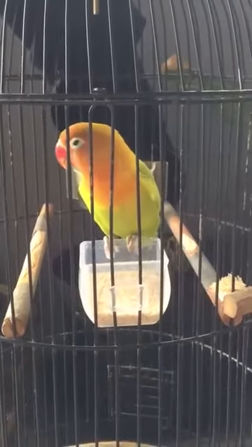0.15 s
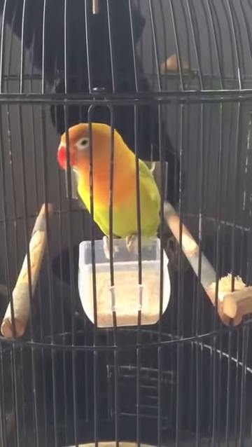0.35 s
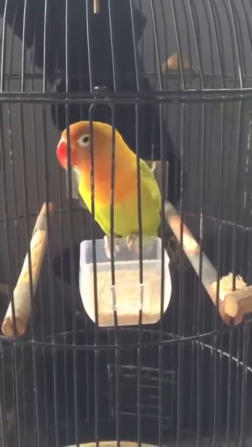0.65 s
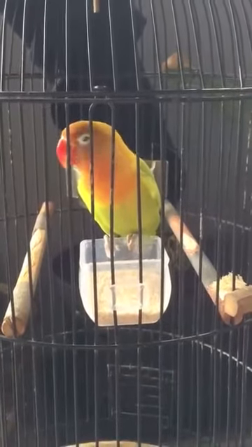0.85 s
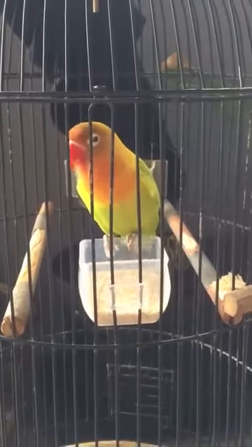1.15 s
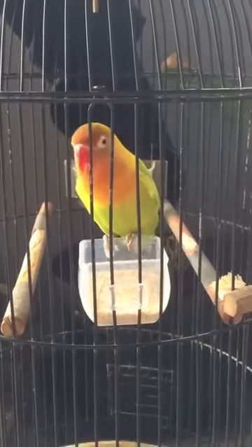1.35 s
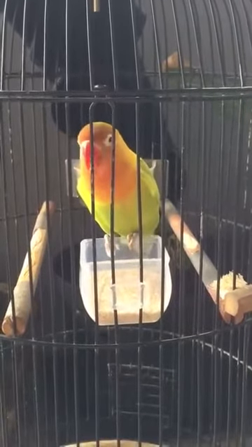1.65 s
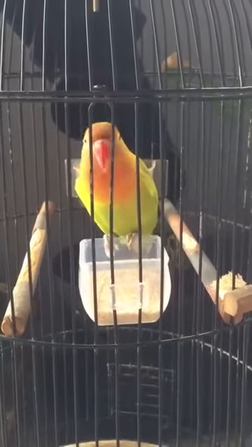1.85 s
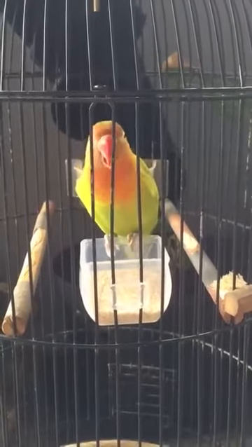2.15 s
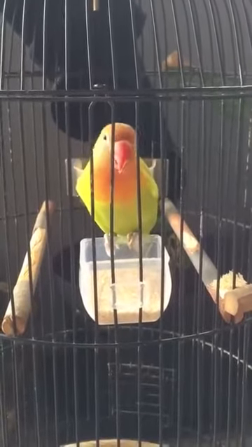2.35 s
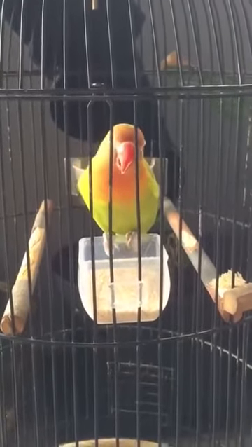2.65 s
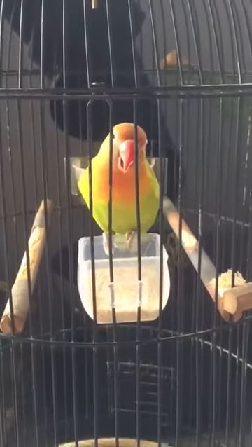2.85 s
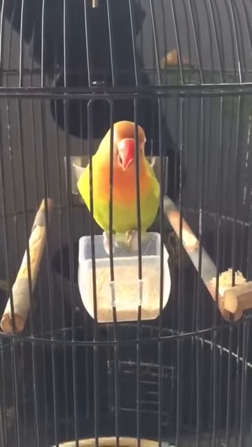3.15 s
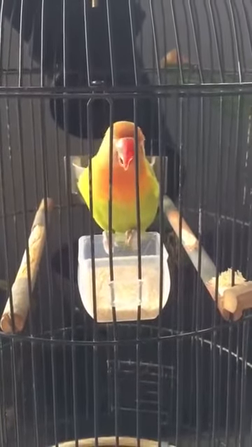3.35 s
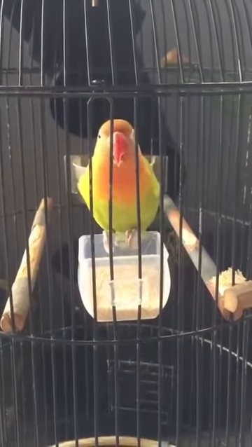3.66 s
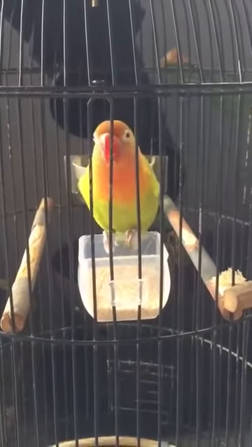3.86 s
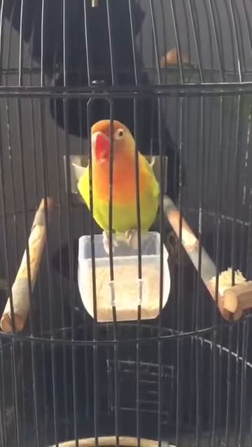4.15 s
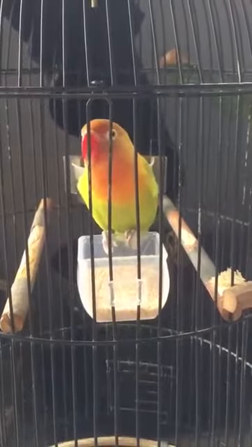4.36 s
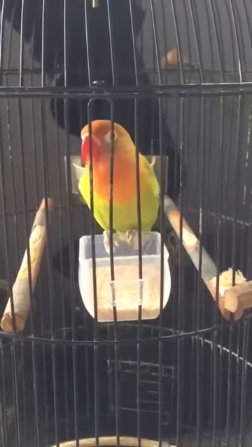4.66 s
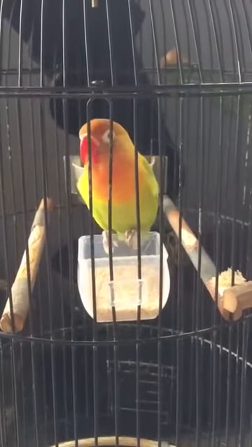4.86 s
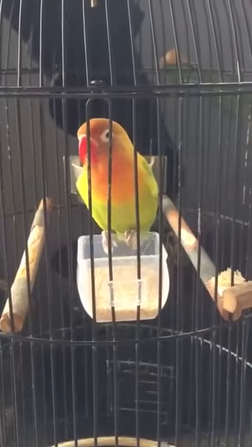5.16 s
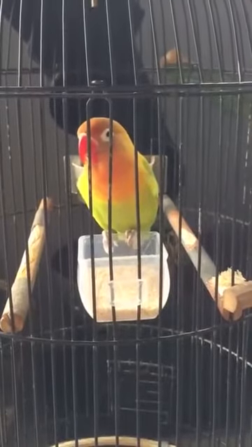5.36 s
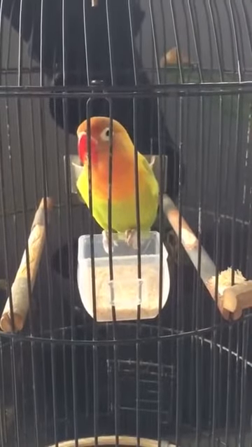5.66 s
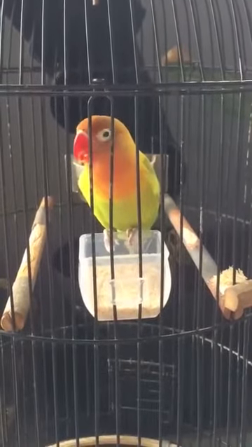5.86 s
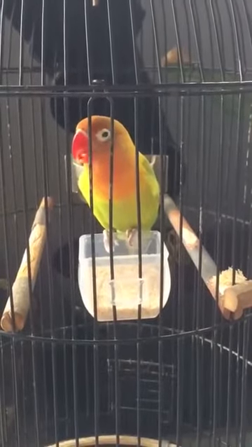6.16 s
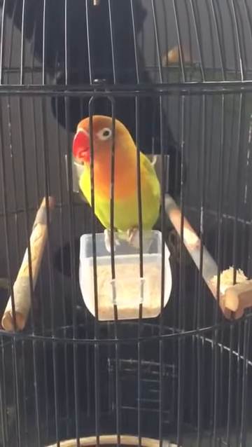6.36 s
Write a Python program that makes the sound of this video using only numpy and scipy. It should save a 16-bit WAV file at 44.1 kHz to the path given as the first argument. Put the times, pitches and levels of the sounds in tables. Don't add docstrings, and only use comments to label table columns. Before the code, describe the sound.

Close, loud and slightly overdriven bird song with a bright room tail. Five thin high whistles open, about four a second; the calls then accelerate to seven or eight a second, cracking from low raspy notes up to shrill ones. Near five seconds they become softer clucks with ticks and a small cloth rustle, then loud swooping chirps return. A distant bird and low rumble are barely audible.

```python
import sys
import numpy as np
from scipy import signal
from scipy.fft import rfft, irfft, next_fast_len
from scipy.io import wavfile
from scipy.ndimage import uniform_filter1d, map_coordinates

SR = 44100
rng = np.random.default_rng(int(sys.argv[2]) if len(sys.argv) > 2 else 0)


def level_to_linear(level):
    exponent = np.asarray(level, float) / 20
    return 10 ** exponent


def dump_mix(stems):
    frames = np.atleast_2d(stems).T
    limited = np.clip(frames, -1, 1)
    pcm = np.round(limited * 32767).astype(np.int16)
    wavfile.write(sys.argv[1], SR, pcm)


N = 287091
T = np.arange(N) / SR
SPLIT_HZ, TOP_HZ = 8700, 15900


def unit(x):
    return x / np.sqrt(np.mean(x ** 2) + 1e-20)


def along(points, hz):
    f, v = np.transpose(points)
    return np.interp(np.log(hz + 1), np.log(f + 1), v)


def wobble(rate):
    return map_coordinates(rng.standard_normal(int(N * rate / SR) + 4), [T * rate])


def filtered(x, response):
    m = next_fast_len(N + 8192)
    return irfft(rfft(x, m) * response(np.fft.rfftfreq(m, 1 / SR)), m)[:N]


def noise(spectrum):
    return unit(filtered(rng.standard_normal(N), lambda hz: level_to_linear(along(spectrum, hz))))


def background():
    # time in seconds, level in dB.
    hum_level = [(0, -67), (1.12, -63), (2.03, -65), (2.9, -65), (3.3, -73), (3.75, -73), (4.05, -60),
                 (4.74, -59), (5.14, -55), (5.56, -58), (6.5, -57)]
    # frequency in Hz, level in dB per Hz.
    low_colour = [(20, -19), (45, -6), (60, -13.5), (80, -8), (130, -17), (157, -7), (190, -18.5),
                  (400, -37), (1500, -27), (2500, -94)]
    # time in seconds, level in dB.
    cloth_level = [
        (5.365, -80),
        (5.378, -39.5),
        (5.47, -46),
        (5.62, -64),
    ]
    hum_db = np.interp(T, *np.transpose(hum_level)) + 1.5 + 4.46 * wobble(6.5)
    hum = level_to_linear(hum_db) * noise(low_colour)
    cloth = noise([(150, -35), (300, -3), (800, -4), (1500, -7), (2300, -26), (4000, -80)])
    cloth_db = np.interp(T, *np.transpose(cloth_level), -120, -120) + 4.36 * wobble(60)
    rustle = level_to_linear(cloth_db) * cloth
    chirp_colour = [(4300, -33.5), (5000, -13), (5700, 3), (6400, -15), (7000, -40), (9000, -90)]
    earlier = level_to_linear(-36.5 - 60 * T / 0.34) * noise(chirp_colour)
    return hum + rustle + earlier


def smeared(rows, spread):
    s, hz, db = np.transpose(rows)
    phase = 2 * np.pi * np.cumsum(np.interp(T, s, hz)) / SR
    blur = wobble(spread) * np.sin(phase) + wobble(spread) * np.cos(phase)
    return level_to_linear(np.interp(T, s, db, -120, -120)) * blur


def far_sounds():
    # time in seconds, pitch in Hz, level in dB.
    falling = [
        (1.06, 3600, -65),
        (1.11, 3560, -47),
        (1.15, 2654, -45),
        (1.22, 2612, -45),
        (1.38, 2500, -60.5),
    ]
    # time in seconds, pitch in Hz, level in dB.
    held = [
        (1.05, 3620, -64),
        (1.12, 3600, -51),
        (1.36, 3550, -63),
    ]
    # time in seconds, pitch in Hz, level in dB.
    whirr = [
        (5.5, 1302, -55),
        (5.75, 1736, -49),
        (5.85, 1956, -64),
    ]
    return smeared(falling, spread=640) + smeared(held, spread=300) + smeared(whirr, spread=320)


def ticks():
    # moment in seconds, peak level in dB.
    tick_rows = [(4.9538, 8.5), (5.04, -4), (5.119, -3), (5.196, -5), (5.362, -4), (5.443, 2.5),
                 (5.5201, 1), (5.606, -2), (5.6845, 5)]
    rasp = noise(HUSK) + 1.2 * np.sin(2 * np.pi * 2350 * T)
    envelope = np.zeros(N)
    for s, db in tick_rows:
        envelope += (T > s) * level_to_linear(db - 35.5 - 60 * np.abs(T - s) / .012)
    return envelope * rasp


def clucks():
    # start in seconds, peak level in dB, pitch in Hz, length in seconds.
    cluck_rows = [(4.9792, -13.5, 2175, 0.0083), (5.0632, -12.5, 2130, 0.008), (5.1429, -12, 2132, 0.0081),
                  (5.2205, -7.5, 2121, 0.0094), (5.3071, -8.5, 2130, 0.0093), (5.3875, -14.5, 2179, 0.007),
                  (5.4685, -9.5, 2121, 0.0086), (5.5456, -7, 2108, 0.0088), (5.6313, -5.5, 2240, 0.009),
                  (5.7108, -7, 2160, 0.0089)]
    # (share of length, pitch factor, dB)
    shape = [(.05, 1.08, -6.5), (.2, 1.02, -4.5), (.7, .99, -9), (1.2, .98, -22)]
    rows = []
    for s, db, hz, length in cluck_rows:
        rows += [(s + share * length, hz * bend, db + drop_db, 3) for share, bend, drop_db in shape]
    return rows


def pips():
    # start in seconds, end in seconds, level in dB, held pitch in Hz, last pitch in Hz.
    whistles = [
        (0.0943, 0.13, -3.5, 5650, 5500),
        (0.3288, 0.364, -3, 5553, 5540),
        (0.5715, 0.606, -2, 5674, 5935),
        (0.7755, 0.809, -3.5, 5525, 5810),
        (0.972, 1.0, -1, 5477, 5380),
    ]
    rows = []
    for s, end, db, hz, last_hz in whistles:
        rows += [(s, 6100, db - 13, -35), (s + .008, 6250, db - 2.5, -35),
                 (s + 0.0097, 5000, db - 8, -35),
                 (s + .014, hz, db, -38), (end - .006, last_hz, db - 2.5, -38),
                 (end, last_hz, db - 24, -35)]
    return rows


def phrase(motif, calls):
    place, first_hz, last_hz, over_db, step_db = np.transpose(motif)
    rows = []
    for (start, crack, end, db, bend), late in zip(calls, np.linspace(0, 1, num=len(calls))):
        s = np.interp(place, range(3), [start, crack, end])
        hz = bend * (first_hz + late * (last_hz - first_hz))
        rows += list(zip(s, hz, db + over_db, step_db))
    return rows


def song():
    # place in the call (0 start, 1 voice break, 2 end), pitch in the first call in Hz,
    # pitch in the last call in Hz, level over the call in dB, step from one overtone to the next in dB.
    hook = [
        (0, 5250, 4400, -12, -15),
        (1, 6100, 5800, -2, -35),
        (1.17, 5550, 5200, 1.2, -28),
        (1.72, 5230, 5330, 1.2, -14),
        (2, 5120, 5250, -20, -17),
    ]
    flick = [(0, 2450, 2450, -13, -2), (.5, 3300, 3300, -6, -2), (.9, 4200, 4200, -13, -6),
             (1, 4950, 4950, -14, -14), (1.07, 5050, 5050, -3, -14), (1.6, 5350, 5350, .3, -18),
             (1.9, 5500, 5500, -3, -24), (2, 5400, 5400, -20, -28)]
    rise = [(0, 3350, 3000, -10, -6), (.4, 2950, 3050, -9, 3), (.72, 3150, 3200, -11, 4),
            (.78, 6250, 6300, -9, -16), (1, 4700, 4750, -7, -12), (1.15, 4950, 4850, -4, -12),
            (1.55, 5400, 5230, .3, -18), (1.86, 5350, 5550, -2, -24), (2, 5350, 5400, -20, -28)]
    climb = [(0, 2500, 2380, -6, 5), (1, 2980, 2860, -5, 5), (1.03, 5900, 5850, -3, -14),
             (1.14, 4950, 4820, -2.5, -12), (1.6, 5180, 5300, -.3, -18), (1.86, 5330, 5550, -1.2, -24),
             (2, 5200, 5300, -20, -28)]
    crack = [(0, 2500, 2150, -15, -6), (.4, 2500, 2150, -10, -2), (1, 2350, 2250, -9, -3),
             (1.07, 2800, 2720, -3, 3), (1.14, 5200, 5100, -2, -14), (1.2, 5850, 5950, .3, -14),
             (1.33, 5300, 5200, -.3, -14), (1.55, 5000, 4950, -3, -14), (2, 5150, 5050, -9, -14)]
    split = [(0, 2000, 1800, -17, -1.2), (.3, 2200, 2200, -10.5, .6), (1, 2230, 2380, -9, 1.2),
             (1.08, 2800, 2800, -4, 3), (1.16, 4900, 5600, -2, -14), (1.3, 5400, 5700, .3, -14),
             (1.6, 4950, 5200, -2.5, -14), (2, 4900, 4850, -9, -14)]
    yelp = [(0, 2100, 1950, -13, -4), (.35, 2620, 3000, -5, -8), (.75, 2700, 2700, -4, -2),
            (.93, 2400, 2450, -7, .3), (1, 5300, 5700, -5, -14), (1.1, 5200, 5850, -3, -14),
            (1.22, 4700, 4600, -.7, -14), (1.5, 4600, 4380, -1.5, -12), (2, 4550, 4290, -10, -8)]
    bark = [(0, 2950, 2950, -9, -16), (.15, 2620, 2620, -3, -12), (.75, 2600, 2600, -4, -4),
            (.93, 2280, 2280, -7, .3), (1, 5400, 5400, -6, -14), (1.12, 5900, 5900, -3, -14),
            (1.33, 4600, 4600, .3, -14), (2, 4500, 4500, -10, -8)]
    stair = [(0, 2080, 2000, -17, -5), (.24, 2130, 2080, -8, -8), (.35, 3640, 3560, -7, -24),
             (.85, 4050, 3950, .3, -17), (1, 4200, 4150, -6, -14), (1.1, 6120, 6080, -.3, -12),
             (1.3, 5850, 5950, -2, -14), (1.52, 4750, 4620, -2, -26), (2, 4400, 4500, -9, -23)]
    step = [(0, 2030, 1990, -14, -7), (.26, 2050, 2040, -8, -9), (.42, 3640, 3480, -6, -26),
            (.9, 3760, 3600, -3, -24), (1, 4050, 3700, .3, -20), (1.06, 6230, 6230, -3.5, -12),
            (1.2, 6200, 6050, -5, -25), (1.33, 4550, 4400, -2, -14), (1.45, 4330, 4300, 2, -10.5),
            (2, 4260, 4180, -6, -9)]
    tread = [(0, 1950, 1950, -15, -8), (.17, 2000, 2000, -9, -10), (.3, 3450, 3420, -6, -22),
             (.8, 3480, 3500, .3, -22), (1, 3500, 3550, -5, -20), (1.06, 5950, 6050, -6, -14),
             (1.24, 5950, 5900, -7, -25), (1.32, 4180, 4220, 2, -11), (2, 4080, 4100, -7, -11)]
    arch = [
        (0, 2050, 2300, -7, -6),
        (.5, 2900, 3450, -1.5, -12),
        (1, 4450, 4650, -2, -20),
        (1.18, 3950, 4150, .5, -17),
        (1.45, 3850, 3850, .5, -17),
        (1.75, 3780, 3750, -.5, -19),
        (2, 3780, 3800, -8, -14),
    ]
    dive = [
        (0, 4100, 4500, -5, -10),
        (.2, 4350, 5250, 1.2, -12),
        (.55, 2550, 3000, -4, -1.2),
        (.8, 2350, 2500, -9, 1.5),
        (1, 2300, 2380, -4, .6),
        (1.5, 2060, 2140, -.2, 3.5),
        (2, 2030, 2060, -12, 7),
    ]
    swoop = [
        (0, 4600, 4900, -7, -35),
        (.3, 5050, 5350, -1.5, -35),
        (.62, 5800, 6000, 6, -38),
        (.8, 5100, 5000, 5, -25),
        (1, 2560, 2400, -10.5, -8),
        (1.15, 2500, 2500, -8, 1.5),
        (1.6, 2920, 2900, 1.5, 10.5),
        (2, 3070, 3100, -6, 7),
    ]
    # start, break and end in seconds, level in dB, pitch factor (no unit).
    hooks = [(1.1844, 1.1899, 1.2207, -4, 1.001), (1.3667, 1.3733, 1.4028, -8, 1.001)]
    flicks = [(1.544, 1.549, 1.5874, -5.5, .999)]
    rises = [(1.6956, 1.7041, 1.7372, -5.5, 1.001), (1.8401, 1.8485, 1.8832, -7, .995),
             (1.9816, 1.9903, 2.026, -7.5, 1.005)]
    climbs = [(2.1148, 2.1229, 2.1594, -8, .99), (2.2522, 2.2611, 2.2975, -8.5, .985),
              (2.3845, 2.3942, 2.4295, -8, 1.02), (2.5108, 2.5212, 2.5593, -7.5, 1.005),
              (2.649, 2.657, 2.6954, -10, 1.015), (2.7858, 2.7918, 2.8313, -9, .99)]
    cracks = [(2.9161, 2.927, 2.963, -9, 1.001), (3.0404, 3.0575, 3.0841, -9, 1.001)]
    splits = [(3.1465, 3.1755, 3.1994, -11, .99), (3.2601, 3.2895, 3.315, -7.5, 1.001),
              (3.3818, 3.4116, 3.436, -8.2, 1.001)]
    yelps = [(3.503, 3.5365, 3.5578, -10, 1.001), (3.736, 3.7735, 3.7941, -11.5, 1.001)]
    barks = [(3.618, 3.6555, 3.6759, -10.5, 1.001)]
    stairs = [(3.8539, 3.8842, 3.9021, -8, 1.001), (3.965, 3.9964, 4.0145, -8.3, .995),
              (4.0779, 4.1067, 4.1295, -8, 1.001)]
    steps = [(4.1875, 4.2196, 4.2503, -11.7, .99), (4.3092, 4.3415, 4.3675, -10.8, 1.001)]
    treads = [(4.4295, 4.4625, 4.4903, -9.5, 1.001), (4.5545, 4.5859, 4.609, -11, 1.001)]
    arches = [(4.6734, 4.6854, 4.714, -11.3, 1.001), (4.778, 4.7924, 4.8169, -12.7, 1.001)]
    dives = [(5.7797, 5.7871, 5.8069, -9, .995), (5.8672, 5.8745, 5.8961, -10, 1.01),
             (5.9568, 5.967, 5.9883, -7.5, 1.001)]
    swoops = [(6.0488, 6.0605, 6.0855, -5, 1.008), (6.1405, 6.1535, 6.1775, -7.5, 1.01),
              (6.232, 6.2445, 6.268, -7.3, 1.015), (6.327, 6.3385, 6.3625, -8, 1.035),
              (6.4251, 6.435, 6.4576, -8.5, .975)]
    phrases = [(hook, hooks), (flick, flicks), (rise, rises), (climb, climbs), (crack, cracks),
               (split, splits), (yelp, yelps), (bark, barks), (stair, stairs), (step, steps),
               (tread, treads), (arch, arches), (dive, dives), (swoop, swoops)]
    rows = pips() + clucks()
    for motif, calls in phrases:
        rows += phrase(motif, calls)
    return sorted(rows)


# frequency in Hz, level in dB per Hz.
HUSK = [(350, -46), (900, -29), (1700, -19), (2300, -10), (3000, -9.5), (4200, -10), (5400, -2),
        (6600, -7.5), (7400, -22.5), (8400, -5), (9000, -12), (10300, 1.5), (11500, -7), (13200, .3),
        (15500, -7)]


def overtones(pitch, step):
    phase = 2 * np.pi * np.cumsum(pitch) / SR
    orders = np.arange(1, 8)[:, None]
    hz = orders * pitch
    low = pitch < 2400
    later_step = np.where(low, step, np.minimum(step, 0))
    loss_db = 5 + 3 * low + (6 - 11 * low) * (hz < 9600)
    size_db = step * (orders > 1) + later_step * (orders > 2) - 7.5 * np.maximum(orders - 3, 0)
    size_db = size_db - loss_db * (hz > 7300) * (orders > 2)
    size = level_to_linear(size_db) * (hz < TOP_HZ)
    return np.sqrt(2) * np.sum(size * np.sin(orders * phase), axis=0) / np.linalg.norm(size, axis=0)


def parrot():
    pause = .036
    s, hz, db, step_db = np.transpose(song())
    cut = np.flatnonzero(np.diff(s) > pause)
    starts, ends = s[np.r_[0, cut + 1]], s[np.r_[cut, -1]]
    k = np.clip(np.searchsorted(starts, T + pause / 2) - 1, 0, None)
    since = T - starts[k]
    gate = np.clip(1 + since / 0.00122, 0, 1) * np.clip(1 + (ends[k] - T) / 0.0012, 0, 1)
    pitch = np.exp(np.interp(T, s, np.log(hz)))
    leap = uniform_filter1d(np.abs(np.gradient(np.log(pitch))) * SR, size=40)
    depth = 0.12 + .45 * np.exp(-np.abs(since) / .022) + 0.12 * wobble(30)
    depth = np.clip(depth, 0, .9) * (pitch > 4400)
    flutter = 2 * np.pi * np.cumsum(230 * (1 + 0.12 * wobble(40))) / SR
    pitch = pitch * (1 + 0.015 * wobble(500) + 0.04 * depth * np.sin(flutter))
    step = np.interp(T, s, step_db)
    tone = overtones(pitch, step)
    tone *= 1 + 0.21 * wobble(1800)
    high = np.interp(starts, s, hz)[k] > 5000
    throat = sum(np.sin(2 * np.pi * ring_hz * T) for ring_hz in (2300, 4000, 8400))
    tone += high * level_to_linear(-18 - 60 * np.abs(since - .003) / 0.021) * throat
    puff = level_to_linear(-8.5 - 60 * np.abs(since) / .03)
    breath = (level_to_linear(-13.5 + 0.27 * np.minimum(step, 0)) + puff) * noise(HUSK)
    loudness = gate * level_to_linear(np.interp(T, s, db) + 1.48 * wobble(300)) * (1 + depth * np.cos(flutter))
    return loudness * (tone / (1 + leap / 250) + breath)


def room(x):
    # frequency in Hz, time to fall by 60 dB in seconds.
    decay = [
        (1000, .6),
        (4000, 0.64),
        (8000, 0.33),
        (14000, 0.52),
    ]
    out, size = np.zeros(N + SR), 5000
    for at in range(0, N, size):
        hz, t, z = signal.stft(rng.standard_normal(SR * 3 // 4), SR, nperseg=256)
        fall_db = -60 * t / along(decay, hz)[:, None] + 9.9 * np.exp(-t / 0.02)
        tail = signal.istft(z * level_to_linear(fall_db), SR, nperseg=256)[1]
        tail = np.pad(tail, (150, 0)) / np.linalg.norm(tail)
        wet = signal.fftconvolve(x[at:at + size], tail)
        out[at:at + len(wet)] += wet[:len(out) - at]
    return out[:N]


def scene():
    near = filtered(parrot() + ticks(), lambda hz: level_to_linear(-7 / (1 + (hz / 1800) ** 12)))
    return (near + level_to_linear(-10.3) * room(near) + far_sounds() + background())[None]


def coarse(v):
    power = uniform_filter1d(np.abs(v) ** 2, size=5, axis=0)
    return np.sqrt(np.abs(uniform_filter1d(power, size=3, axis=1)) + 1e-14)


def top_band(x):
    # from in seconds, to in seconds, place on a grid of 689 Hz from
    # 9130 Hz (no unit), level over the top band in dB.
    pilots = [(3.27, 3.72, 0, -2.5), (4.67, 4.85, 0, -6), (4.0, 4.18, 1, -6), (5.62, 5.85, 1, -7),
              (5.2, 6.13, 2, -8), (5.54, 6.13, 4, -7), (5.86, 6.13, 3, -5), (5.94, 6.13, 5, -6),
              (5.31, 5.83, 7, -11)]
    z, grain = signal.stft(np.array([x, rng.standard_normal(N)]), nperseg=256)[2]
    copy = np.roll(z, shift=44, axis=0)
    size = coarse(copy)
    fine = copy / size * (size / size[50:92].mean(axis=0)) ** 0.2
    fine = fine + 0.45 * grain / coarse(grain)
    top = signal.istft(coarse(z) * fine, nperseg=256)[1][:N]
    top = filtered(top, lambda hz: np.clip((hz - SPLIT_HZ) / 300, 0, 1) * (hz < TOP_HZ))
    level = np.sqrt(np.abs(uniform_filter1d(top ** 2, size=1024, origin=300)))
    tones = np.zeros(N)
    for a, b, k, db in pilots:
        tones += (T > a) * (T < b) * level_to_linear(db) * np.sin(2 * np.pi * (9130 + 689 * k) * T)
    return top + level * tones


def starved(x):
    z = signal.stft(x, nperseg=1024)[2]
    band_db = 10 * np.log10(np.abs(uniform_filter1d(np.abs(z) ** 2, size=14, axis=0)) + 1e-14)
    whim = np.kron(rng.standard_normal((37, z.shape[1] // 3 + 1)), np.ones((14, 3)))
    whim = whim[:len(z), :z.shape[1]]
    bins, loudest_db = np.arange(len(z))[:, None], band_db.max(axis=0)
    share = np.where(bins < 178, bins > 56, .2 + .5 * (bins > 335))
    quiet_db = np.clip(loudest_db.max() - loudest_db, 0, 40) * share
    weak = band_db < loudest_db - 35 + .33 * quiet_db + 5 * whim
    weak[:24] = False
    return signal.istft(z * np.where(weak, level_to_linear(-16), 1), nperseg=1024)[1][:N]


def band_limit(x):
    return signal.sosfilt(signal.butter(12, 15900, fs=SR, output="sos"), x)


def record(dry):
    x = dry[0] / (1 + np.abs(dry[0] / 0.91) ** 8) ** (1 / 8)
    x = x + 0.06 * x ** 6
    low = filtered(x, lambda hz: (hz > 15) * np.clip((SPLIT_HZ - hz) / 250, 0, 1))
    x = starved(low + level_to_linear(-3.5) * top_band(x))
    mix = filtered(np.clip(x, -1, 1), lambda hz: hz < TOP_HZ)[None]
    return band_limit(mix)


dry = scene()
out = record(dry)
dump_mix(out)
```